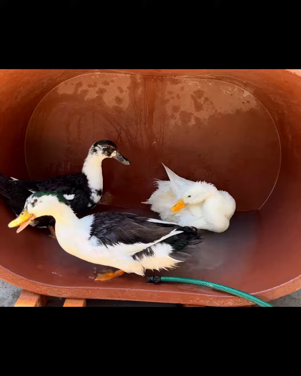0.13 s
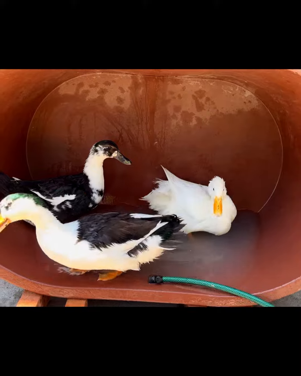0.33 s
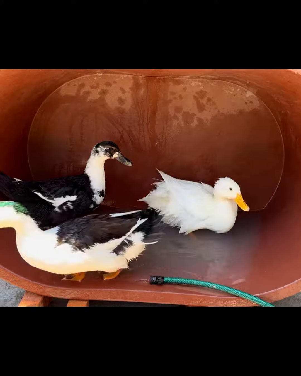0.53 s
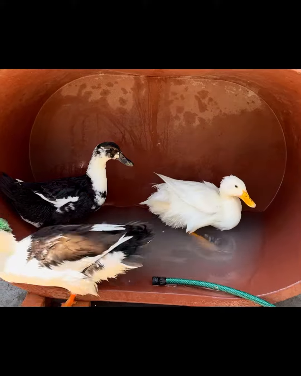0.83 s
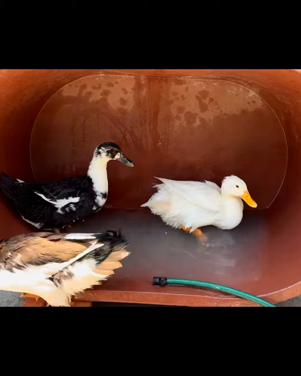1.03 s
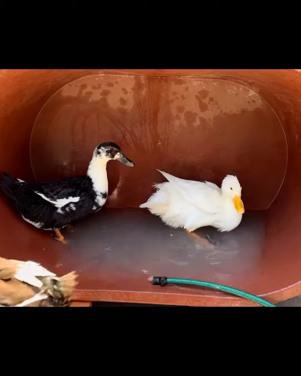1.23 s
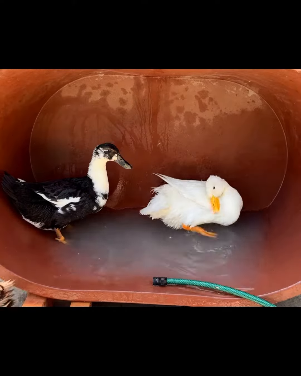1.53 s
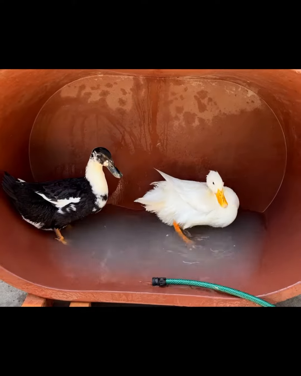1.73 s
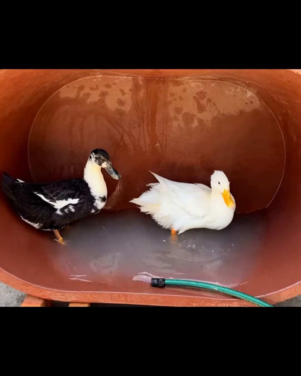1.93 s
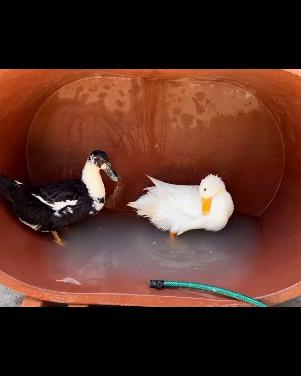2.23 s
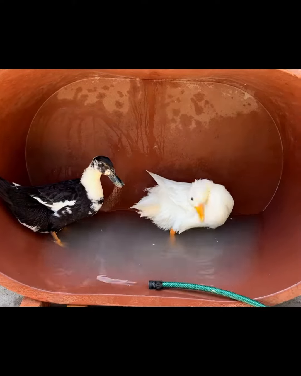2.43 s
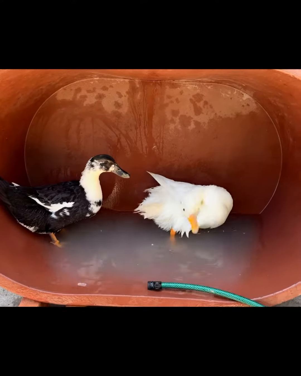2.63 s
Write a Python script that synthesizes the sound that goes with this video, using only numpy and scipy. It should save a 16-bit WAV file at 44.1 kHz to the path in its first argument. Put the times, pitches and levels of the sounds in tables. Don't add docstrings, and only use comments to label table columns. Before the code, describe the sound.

Hoarse breathy duck calls with small whistles, faint water drips and soft wind rumble behind

```python
import sys
import numpy as np
from scipy import signal
from scipy.fft import rfft, irfft
from scipy.io import wavfile
from scipy.ndimage import uniform_filter1d

SR = 44100
rng = np.random.default_rng(int(sys.argv[2]) if len(sys.argv) > 2 else 0)


def unload_wav(signal):
    wavfile.write(
        sys.argv[1],
        SR,
        np.round(np.clip(np.atleast_2d(signal).T, -1, 1) * 32767).astype(np.int16),
    )


def attenuation_scalar(level_db):
    decades = np.asarray(level_db, float) / 20
    return 10 ** decades


N = 122598


def evened(x):
    return x / np.sqrt(np.mean(x ** 2) + 1e-20)


def read(points, hz):
    f, value = np.transpose(points)
    return np.interp(np.log(hz + 1), np.log(f + 1), value)


def along(points):
    s, db = np.transpose(points)
    return attenuation_scalar(np.interp(np.arange(N) / SR, s, db))


def add(mix, s, sound):
    part = mix[..., round(s * SR):][..., :sound.shape[-1]]
    part += sound[..., :part.shape[-1]]


def wander(length, size):
    rough = rng.standard_normal(length)
    return evened(uniform_filter1d(uniform_filter1d(rough, size), size))


def field(points, patchy_db, swell_db):
    frames, hz = N // 256 + 5, np.fft.rfftfreq(1024, 1 / SR)
    a, b, c, d, patches = rng.standard_normal((frames, len(hz), 5)).T
    patches = uniform_filter1d(patches, size=8, axis=0)
    patches = evened(uniform_filter1d(patches, size=8, axis=1))
    gain = attenuation_scalar(patchy_db * patches + swell_db * wander(frames, size=8))
    noise = np.array([a + 1j * b, c + 1j * d]) * gain
    noise = signal.istft(noise, nperseg=1024, noverlap=768)[1][:, :N]
    colour = attenuation_scalar(read(points, np.fft.rfftfreq(N, 1 / SR)))
    return evened(irfft(rfft(noise) * colour, N))


def fuzzy(hz, width_hz):
    r = np.exp(-np.pi * width_hz / SR)
    noise = rng.standard_normal(N) + 1j * rng.standard_normal(N)
    slow = signal.lfilter([1 - r], [1, -r], noise)
    return evened((slow * np.exp(2j * np.pi * hz * np.arange(N) / SR)).real)


# (time [s], pitch [Hz])
EARLY_REEDS = [
    [(.052, 1170), (.062, 1340), (.069, 1600)],
    [(.068, 1297), (.076, 1477), (.084, 1700)],
    [(.086, 1500), (.098, 1370), (.109, 1100)],
    [(.122, 1860), (.126, 1700), (.132, 1660), (.14, 1740), (.147, 1364), (.154, 1350)],
    [(.214, 1315), (.228, 1437), (.232, 1155), (.24, 1130), (.25, 1590), (.256, 1248), (.266, 1253),
     (.272, 1146), (.281, 1040)],
    [(.283, 1510), (.287, 1374), (.298, 1420)],
    [(.299, 1060), (.305, 1184), (.316, 1121), (.327, 895), (.336, 1302), (.347, 1422), (.356, 1028),
     (.366, 1116), (.378, 1210)],
]
# (time [s], pitch [Hz])
MIDDLE_REEDS = [
    [(0.475, 1397), (0.505, 1314), (0.581, 1339), (0.619, 1360), (0.635, 1250), (0.66, 1250)],
    [(1.13, 1366), (1.188, 1448), (1.196, 1630), (1.235, 1595)],
    [(1.388, 1370), (1.522, 1420), (1.532, 1310), (1.54, 1395)],
    [(1.634, 1180), (1.65, 1431), (1.663, 1557), (1.67, 1402), (1.68, 1117), (1.688, 1160), (1.694, 1400)],
    [(1.692, 1030), (1.699, 1160), (1.706, 1060)],
]
# (time [s], pitch [Hz])
LAST_REEDS = [
    [(2.032, 1273), (2.068, 1400), (2.088, 1013), (2.104, 1328), (2.114, 1012), (2.125, 1050)],
    [(2.126, 1500), (2.144, 1403), (2.19, 1464)],
    [(2.452, 1608), (2.466, 1540), (2.49, 1540)],
]
# (level [dB], slope [dB per overtone], odd overtones [dB], break-up [dB])
VOICES = [(-45, -11, -3, 2), (-37.5, -13, -5, -1), (-45, -8, -9, 2.5), (-43.5, -11, -4, 2.5),
          (-47.5, -1, -4.5, 1), (-41.5, -8, 5, -1), (-46.5, 1.5, -12, 2.5), (-61, -7.5, -2, 6),
          (-64, -4, -3, 3.5), (-71, 0, 6, 6), (-45.5, -15, -8, -0.5), (-49, -10, 0, 6), (-43.5, -3, -10, 4),
          (-54, -1, 0, 6), (-47, -12.5, -4.5, 0.5)]


def reed(rows, level_db, slope_db, odd_db, break_db):
    s, pitch = np.transpose(rows)
    t = np.arange(s[0], s[-1], 1 / SR)
    jitter = 0.003 * break_db * wander(len(t), size=130)
    hz = uniform_filter1d(np.interp(t, s, pitch), size=90) * (1 + jitter)
    turns = 2 * np.pi * np.cumsum(hz) / SR
    tone = 0
    for k in range(2, 9):
        overtone_hz = k * hz
        low = 1 / (1 + (2200 / overtone_hz) ** 12) / (1 + (overtone_hz / 3300) ** 12)
        ringing = 1 / (1 + (2 * (overtone_hz - 4400) / 700) ** 4)
        db = slope_db * min(k - 2, 3) + odd_db * (k % 2) + break_db * wander(len(t), size=180)
        tone = tone + attenuation_scalar(db) * np.sqrt(low + ringing) * np.sin(k * turns + k)
    edge_s = 0.005
    fade = np.minimum(1, np.minimum(t - s[0], s[-1] - t) / edge_s)
    return s[0], tone * attenuation_scalar(level_db) * fade


# (frequency [Hz], width [Hz], level [dB])
THROAT = [(2880, 790, 4), (3680, 420, -0.5), (4305, 495, -0.5), (5510, 2500, -14), (6200, 1770, -6),
          (7900, 3050, -20), (9400, 3500, -26.5)]


def throat(hz, narrow=1):
    power = sum(attenuation_scalar(2 * db) / (1 + (2 * (hz - f) / (w * narrow)) ** 4) for f, w, db in THROAT)
    return np.sqrt(power)


def call_swell(u):
    return np.sin(np.pi * u ** 0.75) ** 1.4


# (start [s], length [s], level [dB], brightness [dB per octave], chest [dB])
BREATHS = [(0.038, 0.2, -52, -4, -7), (0.194, .26, -52, 3, -4.5), (0.438, 0.32, -47, -0.5, -4.5),
           (0.659, 0.35, -63, -2.5, 2), (1.091, .21, -59, 3.5, -6), (1.37, 0.23, -55, 2.5, -7),
           (1.616, 0.19, -54, 0.5, -0.5), (1.729, 0.15, -59, 0.5, 2.5), (1.972, .29, -49.5, 2, -1),
           (2.383, 0.2, -60.5, 2, 3), (2.52, 0.25, -53.5, -11.5, -9.5)]


def breath(start, length, level_db, tilt_db, chest_db):
    t = np.arange(int(length * SR)) / SR
    hz = np.fft.rfftfreq(len(t), 1 / SR)
    grain_db, flutter_db = 1, 1.5
    air = (rng.standard_normal(SR) * attenuation_scalar(grain_db * wander(SR, size=40)))[:len(t)]
    chest = chest_db / (1 + (hz / 3180) ** 12)
    colour_db = tilt_db * np.log2(hz / 4000 + 0.03) + chest
    air = irfft(rfft(air) * throat(hz, narrow=0.6) * attenuation_scalar(colour_db), len(t))
    flutter = attenuation_scalar(level_db + flutter_db * wander(SR, size=300)[:len(t)])
    return start, evened(air) * call_swell(t / length) * flutter


# (start [s], length [s], first pitch [Hz], last pitch [Hz], level [dB])
STRANDS = [(.078, 0.012, 4900, 5400, -53), (.112, 0.011, 4450, 4400, -47), (.152, 0.023, 4500, 4300, -51),
           (.165, 0.022, 3200, 3400, -57), (.212, .018, 4200, 4700, -52), (.226, 0.037, 4600, 4500, -49.5),
           (.24, 0.016, 4000, 3750, -55), (.266, 0.011, 4000, 4650, -42), (.273, .009, 4650, 4200, -41),
           (.283, 0.032, 4050, 4500, -44), (.325, 0.016, 4500, 4100, -43), (.352, 0.027, 4150, 4500, -63),
           (.478, 0.019, 4150, 4100, -50.5), (.478, .012, 3050, 3100, -41), (.494, 0.0073, 3000, 3200, -40),
           (.498, 0.011, 3500, 3450, -41.5), (.502, 0.027, 4600, 4600, -52), (.512, 0.021, 3500, 3550, -41),
           (.518, 0.014, 2550, 2700, -49), (.52, 0.039, 4050, 4000, -49), (.546, 0.013, 2600, 2550, -46),
           (.575, 0.035, 4100, 4250, -53), (.625, .025, 3800, 3750, -55), (.628, .03, 2550, 2500, -64),
           (1.16, 0.022, 4200, 4200, -56), (1.19, 0.037, 3200, 3100, -51), (1.385, 0.062, 4100, 4150, -58),
           (1.475, 0.026, 4100, 4250, -53.5), (1.648, 0.015, 3850, 4150, -54),
           (1.645, 0.023, 1900, 2300, -53), (1.675, 0.051, 4500, 4400, -49), (1.706, .008, 3100, 2400, -40),
           (1.714, 0.0064, 2400, 3000, -41), (1.706, 0.019, 4450, 4100, -50),
           (2.06, 0.032, 4500, 4300, -46), (2.08, .022, 4200, 4150, -49), (2.108, .014, 3150, 2850, -42),
           (2.11, 0.025, 4050, 4350, -45), (2.152, 0.013, 2800, 3150, -45), (2.16, .03, 4400, 4450, -63)]


def strand(start, length, first_hz, last_hz, level_db):
    u = np.arange(0, 1, 1 / (length * SR))
    turns = 2 * np.pi * np.cumsum(first_hz + (last_hz - first_hz) * u) / SR
    return start, attenuation_scalar(level_db) * np.sin(np.pi * u) * np.sin(turns)


def rasp(start, length, level_db, *colour):
    out = np.zeros(int(length * SR) + 1000)
    streaks_per_s, glide = 130, 0.12
    for u, a, b, c, d in rng.random((60, 5))[:int(streaks_per_s * length)]:
        streak_s = np.interp(a, (0, 1), (0.006, 0.016))
        hz = np.interp(b, (0, 1), (2700, 5300))
        last_hz = hz * (1 + glide * (2 * c - 1))
        _, streak = strand(0, streak_s, hz, last_hz, level_db - 6 * d)
        add(out, u * length, streak * call_swell(u))
    return start, out


# (start [s], length [s], first pitch [Hz], last pitch [Hz], level [dB])
TRILLS = [
    (.818, .09, 2760, 2740, -50),
    (1.77, .07, 2600, 2800, -60),
    (2.545, .09, 2650, 2900, -56),
    (2.636, .15, 2760, 2580, -53),
]


def trill(start, length, first_hz, last_hz, level_db):
    t = np.arange(0, length, 1 / SR)
    beat = t * 44 % 1
    hz = (first_hz + (last_hz - first_hz) * t / length) * (1.03 - 0.057 * beat)
    turns = 2 * np.pi * np.cumsum(hz) / SR
    notes = np.sin(np.pi * beat) ** 2 * attenuation_scalar(level_db + 0.61 * wander(SR, size=500)[:len(t)])
    return start, notes * (np.sin(turns) + attenuation_scalar(-23) * np.sin(1.72 * turns))


def tub(x):
    t = np.arange(SR // 3) / SR
    fade_60db_s, wall_s = 0.22, 0.0013
    sparse = rng.random((2, len(t))) < 0.05
    taps = rng.standard_normal((2, len(t))) * sparse * attenuation_scalar(-60 * t / fade_60db_s) * (t > 0.002)
    tails = signal.fftconvolve(x[None], taps / np.linalg.norm(taps[0]), axes=1)[:, :N]
    return np.array([x, np.roll(x, round(wall_s * SR))]) + attenuation_scalar(-10) * tails


def drips():
    out, t = np.zeros((2, N)), np.arange(2000) / SR
    drips_per_s, sizes = 120, 16
    for hz in np.geomspace(550, 1900, num=sizes):
        starts = rng.random(N) < drips_per_s / sizes / SR
        strength = attenuation_scalar(np.minimum(rng.exponential(1, N), 2.5)) * starts
        ring = np.sin(2 * np.pi * hz * t * (1 + 5.2 * t))
        bubble = ring * np.exp(-t * hz / 9) * np.minimum(t / 0.002, 1)
        out += signal.oaconvolve(strength, bubble)[:N]
    return attenuation_scalar(-65.5) * evened(out)


# (frequency [Hz], level [dB per Hz])
WIND = [(12, -84), (20, -41), (40, -11.5), (71, -3), (243, -13), (270, -16.5), (323, -20), (398, -23),
        (700, -35.5), (910, -72), (1540, -120)]
# (time [s], level [dB])
GUST = [(0.04, -38), (0.14, -32), (0.16, -36), (1.08, -35), (2.11, -40), (2.17, -34.5), (2.66, -38),
        (2.71, -36), (2.78, -34)]
# (frequency [Hz], width [Hz], level [dB])
MOANS = [(60.08, 1.3, -13), (82.5, 4.4, -11)]


def wind():
    moans = sum(attenuation_scalar(db) * fuzzy(hz, width_hz) for hz, width_hz, db in MOANS)
    return (field(WIND, patchy_db=-0.5, swell_db=0.0) + moans) * along(GUST)


# (frequency [Hz], level [dB per Hz])
WASH = [(150, -11), (350, -2), (650, -10.5), (1000, -8.5), (1700, -19.5), (3000, -22.5), (5000, -39),
        (11500, -55), (15700, -51), (15900, -99)]


def wash():
    return attenuation_scalar(-44) * field(WASH, patchy_db=2.0, swell_db=0.37)


# (time [s], level [dB])
HUM = [(.04, -33.5), (.3, -30), (.42, -39.5), (.5, -33), (.6, -35), (.68, -38.5), (1.05, -48.5),
       (1.2, -61.5), (2.05, -41.5), (2.3, -48.5), (2.78, -39.5)]


def motor_hum():
    hz = 122.86
    steady = np.sin(2 * np.pi * hz * np.arange(N) / SR)
    return (attenuation_scalar(-6.5) * fuzzy(hz, width_hz=2.94) + steady) * along(HUM)


# (frequency [Hz], phase
TURN = [(0, 0), (340, -.6), (430, -3.5), (950, -3.85), (1600, -3.1), (1900, -1.1), (2150, -1.2),
        (2400, -3.4),
        (4000, -4.4), (4800, -3.1), (5200, -2.2), (5550, -2.8), (6550, -3.5)]
# (frequency [Hz], level [dB])
RIGHT = [(80, -.2), (200, -3.5), (380, -14), (650, -3), (1300, -3), (1700, 0), (2600, -4), (4900, 6),
         (5600, 0)]
# (frequency [Hz], likeness [0-1])
SAME = [(40, .975), (120, .97), (380, .6), (650, .9), (1400, .8), (1750, .3), (2200, .4), (2700, .68),
        (5100, .68), (5500, .998)]


def ports(x):
    hz = np.fft.rfftfreq(N, 1 / SR)
    f, turn = np.transpose(TURN)
    delay_s = 0.000258
    turn = np.interp(hz, f, turn) - 2 * np.pi * delay_s * np.maximum(hz - f[-1], 0)
    same = np.clip(read(SAME, hz), 0, 1)
    direct, stray = rfft(x)
    right = same * direct + np.sqrt(1 - same ** 2) * stray
    right = right * np.exp(1j * turn) * attenuation_scalar(read(RIGHT, hz))
    return irfft([direct, right] * (hz < 15700), N)


def scene():
    syllables = EARLY_REEDS + MIDDLE_REEDS + LAST_REEDS
    sounds = [reed(rows, *voice) for rows, voice in zip(syllables, VOICES)]
    for source, table in ((breath, BREATHS), (trill, TRILLS), (strand, STRANDS), (rasp, BREATHS)):
        sounds += [source(*row) for row in table]
    ducks = np.zeros(N)
    for sound in sounds:
        add(ducks, *sound)
    return ports(tub(ducks) + drips() + wind() + wash() + motor_hum())


def band_limit(x):
    return signal.sosfilt(signal.butter(12, 16540, fs=SR, output="sos"), x)


def record(dry):
    start = 1600
    t = (np.arange(N) - start) / SR
    pop = attenuation_scalar(-25.5) * np.exp(-abs(t) / 0.0024)
    switched_on = np.clip(t * SR / 2, 0, 1)
    return band_limit((dry + pop) * switched_on)


dry = scene()
out = record(dry)
unload_wav(out)
```